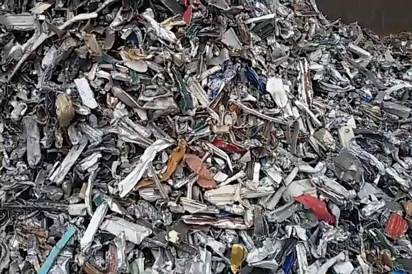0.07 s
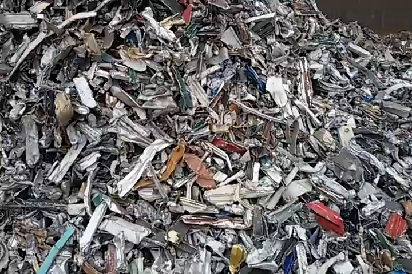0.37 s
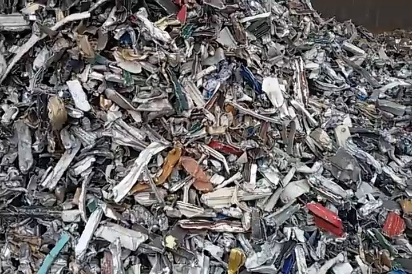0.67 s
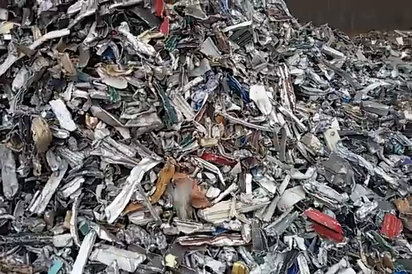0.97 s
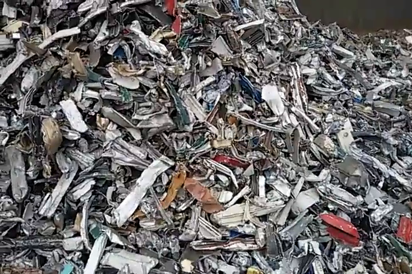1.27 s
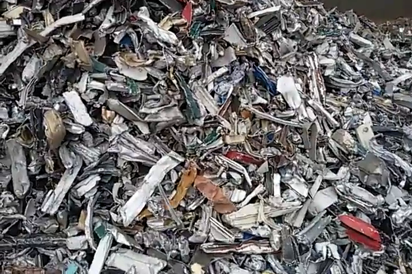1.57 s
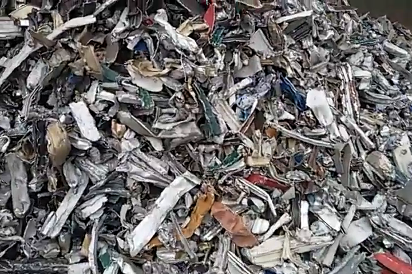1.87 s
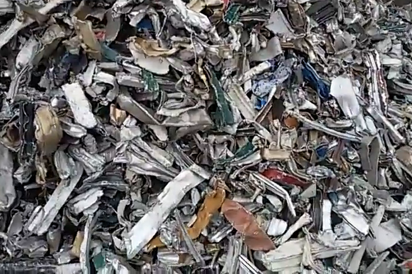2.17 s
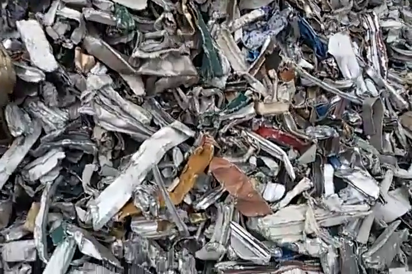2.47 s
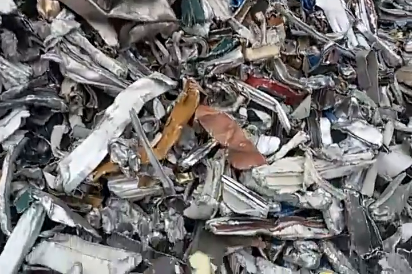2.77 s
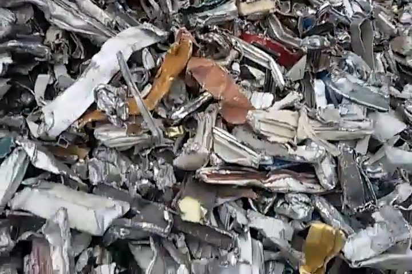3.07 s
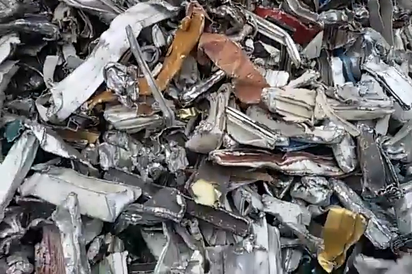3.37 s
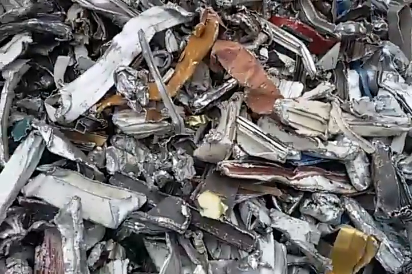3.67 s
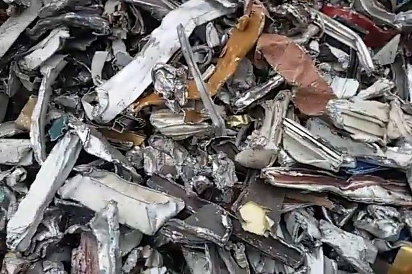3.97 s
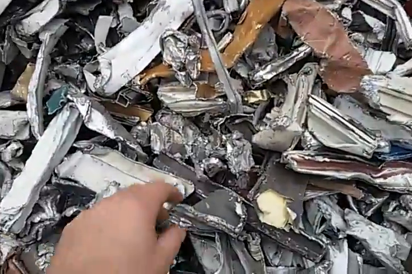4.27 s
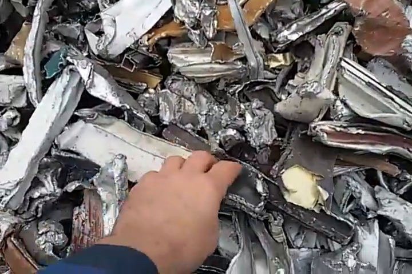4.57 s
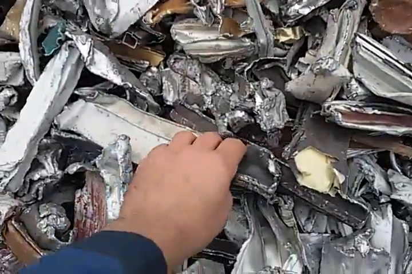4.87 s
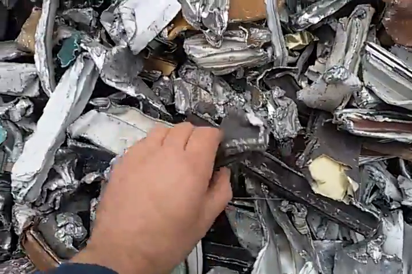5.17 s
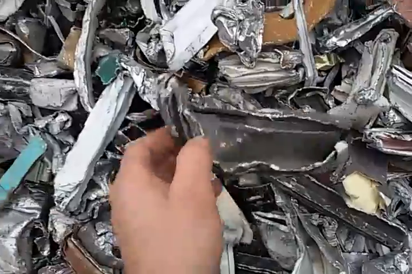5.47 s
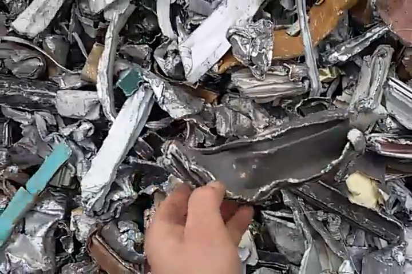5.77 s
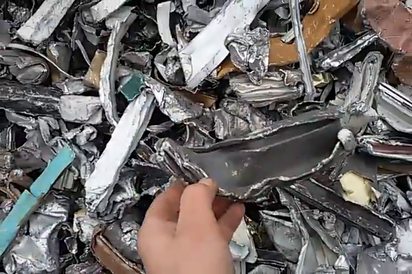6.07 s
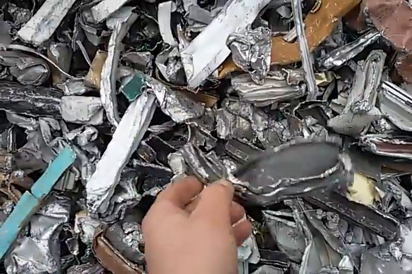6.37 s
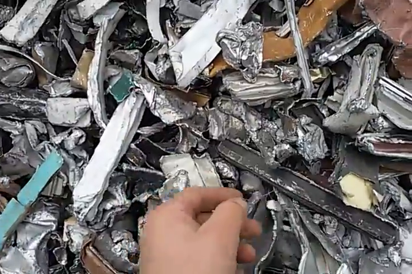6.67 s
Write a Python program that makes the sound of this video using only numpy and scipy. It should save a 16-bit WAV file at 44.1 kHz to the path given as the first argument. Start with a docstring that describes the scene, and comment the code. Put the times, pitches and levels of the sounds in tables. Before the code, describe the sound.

After a short silence, a dense, bright clatter of shredded metal falling onto a heap swells in at about 0.4 seconds, over the low hum and rumble of machinery. It dips for an instant, and the first clinks land just after 0.5 seconds. From 1 second, stiff pieces ring with short, high notes and heavier lumps knock dully, mostly before 3 seconds. From about 1.4 seconds, sliding edges give occasional tiny, high squeaks. Near 2 seconds the motor hum shifts to a lower tone while the machinery churns on. Sharp clinks keep standing out from the fine tinkling of small splinters, with the hardest landings between about 4.2 and 4.5 seconds. More strong clinks follow around 5 seconds, a dull knock comes near 6 seconds, and the scrap keeps falling until the end, just before 7 seconds.

```python
"""Shredded aluminium scrap tumbles onto a heap in a recycling yard.
After a short silence a dense clatter of small pieces swells over the hum and rumble of machinery,
dips briefly, and the first loud clink lands. From 1 s on, stiff pieces ring and heavy lumps knock dully;
then scraping edges begin to squeak, and near 2 s two motors trade the load.
The hardest landings come just after 4 s, and the scrap keeps falling to the end."""
import sys
import numpy as np
from scipy import signal
from scipy.fft import rfft, irfft
from scipy.io import wavfile
from scipy.ndimage import uniform_filter1d

SR = 44100
rng = np.random.default_rng(int(sys.argv[2]) if len(sys.argv) > 2 else 0)


def transcribe(u):
    """Save the signal u as a 16-bit wav file named by the first command-line argument.

    u: samples, shape (n,) or (channels, n), limited to [-1, 1]; the rate is SR.
    q: integer samples, one column per channel.
    """
    v = np.clip(np.atleast_2d(u).T, -1, 1)
    q = np.round(v * 32767).astype(np.int16)
    wavfile.write(sys.argv[1], SR, q)


N = 300762

# Levels are relative within each layer.
# two motors trading the load: f/Hz, level before/dB, level after/dB, t of the change/s
MOTORS = [(134.7, -45.5, -40.5, 1.65), (177.6, -40.5, -48, 2.05)]
RUMBLE_SPECTRUM = [(20, -24), (33, -24), (45, 1), (65, 2), (81, 8), (100, 2.5), (160, 2.5), (230, 0),
                   (400, -19.5), (1000, -60)]  # steady rumble of the plant: f/Hz, level/dB
CHURN_SPECTRUM = [(90, -53), (180, -4.5), (260, 1), (400, -3.5), (650, -5.5), (1000, -3), (2000, -11.5),
                  (5000, -52)]  # material churning in the machinery: f/Hz, level/dB
CHURN_LEVELS = [(0.55, -39.5), (0.9, -36), (1.8, -33.5), (2.1, -32.5), (2.45, -36.5), (2.8, -32),
                (3.05, -36.5), (4.2, -38.5), (4.5, -40.5), (5.15, -40), (5.4, -37), (5.7, -39.5),
                (6.0, -35), (6.3, -39.5), (6.8, -36.5)]  # course of that churning: t/s, level/dB
LUMPS = [(1.014, -25.5, 1106, 0.84), (1.384, -24, 1090, .1), (1.69, -20, 1058, 0.57), (1.849, -21, 205, .1),
         (2.059, -23.5, 501, .1), (2.12, -18.5, 291, 0.05), (2.319, -17, 902, .1), (2.511, -20, 251, 0.16),
         (2.723, -20, 276, .1), (2.759, -18.5, 270, 0.17), (2.972, -26, 896, 1), (3.099, -24, 520, 0.24),
         (3.775, -30, 783, 0.8), (4.158, -22, 1080, 0.44), (5.991, -22, 580, .1), (6.03, -27, 675, 0.65)]  # heavy and hollow pieces: t/s, level/dB, f/Hz, hollowness (0-1)
STREAM_LEVELS = [(0.65, -26, -43), (0.79, -22, -37.5), (0.99, -20, -33), (1.35, -22, -35),
                 (1.52, -20.5, -31), (2.04, -21, -35.5), (2.72, -19.5, -31), (3.37, -19, -29.5),
                 (3.7, -21.5, -34), (5.41, -20.5, -29.5), (5.99, -21, -34), (6.8, -21, -37.5)]  # flow of scrap: t/s, shard level/dB, splinter level/dB
STREAM_SPECTRUM = [(250, -38), (500, -10), (900, -21), (1500, -10), (2300, -6.5), (3200, -3.5),
                   (4200, -2.5), (5150, 2), (6000, -6.5), (6900, -11.5), (8700, -14), (11300, -25),
                   (15800, -21.5)]  # clatter of the shards: f/Hz, level/dB
SCRAPES = [(1.39, 0.031, 5650, -14.5), (1.687, .017, 5170, -14), (2.265, 0.007, 3950, -7.5),
           (2.615, 0.025, 4660, -16), (3.211, 0.021, 5890, -15.5), (3.627, 0.061, 6250, -7.5),
           (3.939, 0.024, 5860, -16.5), (4.007, 0.0069, 5240, -2.5), (4.105, 0.0081, 8580, -16),
           (4.449, 0.028, 5020, -6), (4.811, 0.021, 2590, -19.5), (5.167, 0.0096, 4900, -4),
           (5.223, 0.024, 6180, -14.5), (5.254, .013, 5080, -12)]  # edges sliding over one another: t/s, duration/s, f/Hz, level/dB
STIFF_PIECES = [(1.022, 2960, -18.5, .29), (1.526, 5520, -12.5, .19), (1.532, 7100, -19, .16),
                (1.655, 2940, -23, .24), (1.93, 3520, -12.5, .25), (2.014, 2060, -23.5, 0.73),
                (2.021, 8250, -18, .14), (2.045, 3580, -21.5, 0.46), (2.427, 4310, -13, .24),
                (2.47, 2634, -20.5, .37), (2.468, 3273, -18.5, .5), (2.52, 5260, -16.5, .45),
                (2.585, 4740, -19, .34), (2.787, 3180, -13, .18), (2.931, 2340, -23, .7),
                (2.942, 5038, -20, .7), (2.944, 3962, -14, 0.28), (2.944, 2056, -20, 0.77),
                (2.953, 3180, -20, .5), (2.955, 5730, -7, 0.1), (3.04, 4780, -13, 0.51),
                (3.177, 2305, -16, .18), (3.25, 2067, -25.5, .6), (3.438, 2150, -18, .38),
                (3.451, 1520, -27.5, 1), (3.66, 3780, -15.5, 0.35), (4.016, 4520, -14, 0.38),
                (4.277, 5120, -1, .1), (4.312, 4520, -11, 0.36), (4.353, 1876, -24.5, 0.52),
                (4.472, 1855, -24.5, 0.81), (4.559, 3255, -14.5, 0.4), (4.649, 3020, -20, .2),
                (4.752, 3290, -23, .41), (4.755, 2475, -23, 0.65), (4.88, 1564, -23, .36),
                (5.012, 3251, -20, .27), (5.135, 3840, -17.5, .73), (5.172, 5964, -21, .39),
                (5.411, 4230, -12, 0.19), (5.42, 3780, -17.5, 0.37), (5.662, 3240, -20.5, .35),
                (5.678, 2519, -27, .3), (6.275, 3090, -13, 0.24), (6.326, 3190, -20, .51),
                (6.627, 2150, -18.5, .27), (6.635, 3240, -15, .18), (6.639, 5146, -13, .2),
                (6.645, 1254, -29.5, 1), (6.665, 1120, -30, 1)]  # pieces that hold one note: t/s, f/Hz, level/dB, T60/s
BIG_PIECES = [(0.536, -22, .25, -29), (0.639, -17.5, 0.58, -32), (0.775, -21, 0.54, -22),
              (0.995, -16, .35, -34), (1.1, -20, 0.32, -35), (1.325, -16.5, 0.44, -35),
              (1.395, -20, .44, -22), (1.521, -20, 0.29, -19), (1.59, -14, 0.46, -29),
              (1.893, -10.5, 0.43, -27), (1.93, -15, .52, -36), (2.012, -19, 0.32, -20),
              (2.222, -24, .65, -23), (2.264, -17, 0.15, -19), (2.399, -15, .1, -32),
              (2.69, -16, 0.38, -22), (2.783, -17, .26, -36), (2.81, -21, .38, -18.5),
              (2.928, -29, .2, -18), (3.035, -10, 0.16, -17), (3.426, -9, 0.21, -26),
              (3.535, -14, .26, -35), (3.88, -16, 0.26, -21), (3.946, -21, 0.44, -21),
              (4.015, -11, 0.14, -37), (4.179, -19, 0.56, -23), (4.267, -7, 0.23, -8),
              (4.35, -20, .21, -20), (4.457, -12, .27, -12), (4.504, -10, 0.06, -21),
              (4.603, -22, 0.71, -26), (4.75, -22, 0.42, -26), (4.877, -10, 0.16, -19),
              (4.937, -17.5, 0.25, -14.5), (5.079, -16, 0.25, -38), (5.129, -10, 0.2, -20),
              (5.17, -11, 0.35, -24), (5.258, -20, 0.42, -21), (5.41, -16, 0.47, -34),
              (5.454, -19, 0.37, -22), (5.657, -18, 0.39, -21), (5.824, -12.5, .21, -21),
              (5.906, -20, 0.65, -20), (6.276, -15.5, 0.44, -18), (6.323, -20, .74, -24),
              (6.565, -13, 0.082, -36), (6.627, -13, 0.35, -32)]  # the biggest landings: t/s, level/dB, nominal T60/s, crack level/dB
OPENING_SWELL = [(.372, -90), (.382, -30), (.405, -14), (.48, -3), (.515, -4), (.524, -15), (.534, -15),
                 (.536, 0)]  # fade-in with a brief dip: t/s, gain/dB
# spectra of the clatter's treble, the splinters, and a landing's rasp and crack: f/Hz, level/dB
TREBLE_SPECTRUM = [(5500, -45), (6500, -17), (7500, -5)]
TINKLE_SPECTRUM = [(3000, -24), (7000, -21), (9000, 2), (11500, -7), (15800, -4.5)]
RASP_SPECTRUM = [(600, -22), (1600, -9), (3547.8, -2), (5200, 0), (6800, -8), (9000, -11),
                 (12000, -21), (16000, -24)]
CRACK_SPECTRUM = [(900, -34), (3000, -2), (5200, 1), (8500, -1.5), (12000, -13.5), (16000, -17)]
# broad resonance of a lump: f/f0, level/dB
THUD_SPECTRUM = [(.25, -30), (.5, -11), (1, 0), (1.06, -5.5), (2, -11), (6, -35), (16, -60)]


def amp(db):
    """Amplitude ratio of a level in decibels."""
    return 10 ** (np.asarray(db) / 20)


def unit(x):
    """Normalisation to rms 1."""
    return x / np.sqrt(np.mean(x ** 2) + 1e-20)


def clock(length):
    """Sample times over a duration in seconds."""
    return np.arange(int(length * SR)) / SR


def curve(rows, column=1):
    """Linear interpolation of a table column in time."""
    rows = np.asarray(rows)
    return np.interp(np.arange(N) / SR, rows[:, 0], rows[:, column])


def add(mix, s, sound):
    """Superposition of a sound on the mix at time s."""
    part = mix[max(round(s * SR), 0):][:len(sound)]
    part += sound[:len(part)]


def colour(x, points):
    """Spectral shaping by (f/Hz, level/dB) points on a logarithmic frequency axis."""
    hz, db = np.transpose(points)
    bin_hz = np.fft.rfftfreq(len(x), 1 / SR)
    gain = amp(np.interp(np.log(bin_hz + 1), np.log(hz), db))
    return irfft(rfft(x) * gain, len(x))


def drift(rate_hz, size=N):
    """Random fluctuation: low-pass Gaussian noise of rms 1."""
    hz = np.fft.rfftfreq(size, 1 / SR)
    return unit(irfft(rfft(rng.standard_normal(size)) * np.exp(-(hz / rate_hz) ** 2), size))


def bending_modes(hz, weight, t60, t):
    """Free vibration: a sum of damped modes, each of random strength, decay and phase."""
    strength, life, phase = rng.standard_normal((3, len(hz), 1))
    decay = np.log(1000) / (t60 * np.exp(0.41 * life))
    angle = 2 * np.pi * hz[:, None] * t + np.pi * phase
    return (weight * strength[:, 0]) @ (np.exp(-decay * t) * np.sin(angle))


def contact(t, t60):
    """Contact noise of a crumpled edge: a burst with exponential decay."""
    return rng.standard_normal(len(t)) * amp(-60 * t / t60)


def landings(per_s, spread_db=3):
    """Uniformly random arrivals: rows of t/s, level/dB, place in the pitch range (0-1)."""
    when, force, place = rng.random((round(per_s * N / SR), 3)).T
    return zip(when * N / SR, spread_db * (2 * force - 1), place)


def machinery(settle_s=0.45, waver_hz=1.294, throb_db=2.5, lumpy_db=2):
    """Tones over broadband noise: each motor's hum follows its load, amid rumble and lumpy churning."""
    rumble = amp(-40.5) * unit(colour(rng.standard_normal(N), RUMBLE_SPECTRUM))
    lumpy_noise = rng.standard_normal(N) * amp(lumpy_db * drift(31))
    churn = amp(curve(CHURN_LEVELS) + 1.5) * unit(colour(lumpy_noise, CHURN_SPECTRUM))
    hum = np.zeros(N)
    for hz, before_db, after_db, shift_s in MOTORS:
        shifted = np.clip((np.arange(N) / SR - shift_s) / settle_s + .5, 0, 1)
        note = np.sin(2 * np.pi * np.cumsum(hz + waver_hz * drift(6.7)) / SR)
        throb = amp(throb_db * drift(16))
        hum += amp(before_db + (after_db - before_db) * shifted) * unit(throb * note)
    return rumble + churn + hum


def knocks(thud_t60=0.12, rise_s=0.0036, level_db=-10, note_db=11, note_t60=0.28):
    """Damping broadens a resonance: lumps thud on the heap, and hollow ones keep a short note."""
    out, t = np.zeros(N), clock(.25)
    onset = 1 - np.exp(-t / rise_s)
    for s, db, hz, hollow in LUMPS:
        resonance = [(hz * ratio, gain_db) for ratio, gain_db in THUD_SPECTRUM]
        thud = onset * colour(contact(t, thud_t60), resonance)
        note = hollow * onset * amp(note_db - 60 * t / note_t60) * np.sin(2 * np.pi * hz * t)
        add(out, s, amp(db + level_db) * (thud / np.std(thud[t < .025]) + note))
    return out


def shards(per_s, spread_db, low_hz, high_hz, t60, tick_share, tick_t60, modes, kinds):
    """Poisson impacts, a few much harder; by similarity, a shard's size shifts all its modes together."""
    out, t = np.zeros(N), clock(0.081)
    impacts = []
    for _ in range(kinds):
        hz = np.exp(rng.uniform(np.log(low_hz), np.log(high_hz), size=modes))
        ring = unit(bending_modes(hz, np.sqrt(hz), t60, t))
        impacts.append(ring + tick_share * unit(contact(t, tick_t60)))
    chance, force, smallness, kind = rng.random((4, N))
    gain = amp(spread_db * np.minimum(-np.log(force + 1e-9), 3.6))
    for n in np.flatnonzero(chance < per_s / SR):
        speed = 1 + .2 * (smallness[n] - .5)
        impact = np.interp(t * speed, t, impacts[int(kind[n] * kinds)], right=0)
        add(out, n / SR, gain[n] * impact)
    return unit(out)


def clatter(far_db=-5, treble_db=-3.5, tinkle_db=-5, gush_db=2, gush_hz=14):
    """Incoherent summation: far shards merge to a wash under near ones; splinters tinkle in gushes."""
    near = shards(per_s=520, spread_db=3, low_hz=900.7, high_hz=14000, t60=0.095,
                  tick_share=0.47, tick_t60=0.021, modes=24, kinds=40)
    far = amp(far_db) * rng.standard_normal(N)
    scrap = unit(colour(near + far, STREAM_SPECTRUM))
    treble = colour(scrap, TREBLE_SPECTRUM)
    splinters = shards(per_s=150, spread_db=5, low_hz=6730, high_hz=14600, t60=0.062,
                       tick_share=0.35, tick_t60=.008, modes=4, kinds=30)
    tinkles = unit(colour(splinters, TINKLE_SPECTRUM))
    gushes = amp(gush_db * drift(gush_hz))
    fine = (amp(treble_db) * unit(treble) + amp(tinkle_db) * tinkles) * gushes
    return amp(curve(STREAM_LEVELS)) * (scrap - treble) + amp(curve(STREAM_LEVELS, column=2)) * fine


def squeaks(glide=0.018, jitter=0.0073, flutter=.4, tail_t60=0.094, tail_db=-7):
    """Stick-slip friction drives one mode; its pitch climbs with the pressure and the heap scatters it."""
    out = np.zeros(N)
    for s, length, hz, db in SCRAPES:
        progress = clock(length) / length
        pitch = hz * (1 + glide * (progress - .5) + jitter * drift(500, len(progress)))
        tone = np.sin(2 * np.pi * np.cumsum(pitch) / SR) * (1 + flutter * drift(570, len(progress)))
        add(out, s, amp(db) * unit(tone) * np.sin(np.pi * progress))
    tail = contact(clock(.15), tail_t60)
    scattered = signal.oaconvolve(out, tail / np.linalg.norm(tail))[:N]
    return out + amp(tail_db) * scattered


def rings(rise_s=0.00078, twin_share=0.25, split_hz=24, chatter=0.33, level_db=-1):
    """Beating of close modes: a bent piece holds a note over weaker ones as its neighbours jostle it."""
    out, t = np.zeros(N), clock(.7)
    onset = 1 - np.exp(-t / rise_s)
    low_hz, high_hz, faint_db, faint_t60 = 2200, 6200, -27, .36
    faint = [(s, low_hz * (high_hz / low_hz) ** place, faint_db + db, faint_t60)
             for s, db, place in landings(per_s=7)]
    for s, hz, db, t60 in list(STIFF_PIECES) + faint:
        side, phase = rng.uniform(-1, 1, size=2)
        beat_hz = split_hz * (side + np.sign(side))
        beating = 1 + twin_share * np.exp(1j * np.pi * (2 * beat_hz * t + phase))
        jostle = 1 + chatter * (drift(66, len(t)) + 1j * drift(50, len(t)))
        note = amp(-60 * t / t60) * (np.exp(2j * np.pi * hz * t) * beating * jostle).real
        jangle_hz = hz * 1.6 ** rng.uniform(-.5, 1, size=5)
        jangle = bending_modes(jangle_hz, weight=.16, t60=0.66 * t60, t=t)
        add(out, s, amp(db + level_db) * onset * (note + jangle))
    return out


def clinks(cluster_hz=4380, spread=0.088, log_width=0.35, crumple_s=0.00064, bounce=0.17):
    """Impact excitation: larger pieces land with a crack, ring in a cluster of modes and rebound once."""
    out, t = np.zeros(N), clock(0.36)
    onset = 1 - np.exp(-t / crumple_s)  # a crumpled edge gives way, so the landing takes time to build
    light_db, light_t60, light_crack_db = -24.5, 0.21, -36
    light = [(s, light_db + db, light_t60, light_crack_db + db) for s, db, _ in landings(per_s=5)]
    for s, db, t60, crack_db in list(BIG_PIECES) + light:
        # each clink rings in a bright cluster near 4.4 kHz, varying slightly at random
        centre_hz = cluster_hz * (1 + spread * rng.uniform(-1.2, 1))
        hz = np.exp(rng.uniform(np.log(1400), np.log(13000), size=70))
        weight = np.exp(-np.log(hz / centre_hz) ** 2 / (2 * log_width ** 2)) + 0.017
        ring = bending_modes(hz, weight, 0.71 * t60, t)
        rasp_spectrum = list(RASP_SPECTRUM)
        rasp_spectrum[2] = (0.81 * centre_hz, -2)  # the lower shoulder follows the cluster
        rasp = colour(contact(t, 0.61 * t60), rasp_spectrum)
        strike = amp(db - 3) * (ring / np.std(ring[t < .012]) + rasp / np.std(rasp[t < .012]))
        crack = colour(contact(t, t60=0.11), CRACK_SPECTRUM)
        crack *= amp(crack_db + 3) / np.std(crack[t < .005])
        add(out, s, onset * (strike + crack))
        rebound_s = s + rng.uniform(0.0054, .022)
        add(out, rebound_s, bounce * strike * amp(-60 * t / t60))
    return out


def scene():
    """Superposition of the scrap heap and the plant behind it, in one channel."""
    return (clatter() + clinks() + rings() + squeaks() + knocks() + machinery())[None]


def record(dry, threshold_db=-17, squeeze=0.41, recovery_db_per_s=170, ceiling=.8, edge_hz=15830):
    """Dynamic compression: after the fade-in, loud clinks duck the yard; soft clip and low-pass follow."""
    t = np.arange(N) / SR
    x = dry * amp(curve(OPENING_SWELL)) * (t > OPENING_SWELL[0][0])
    power_db = 10 * np.log10(abs(uniform_filter1d(x[0] ** 2, size=200)) + 1e-12)
    fall_db = t * recovery_db_per_s
    held_db = np.maximum.accumulate(power_db + fall_db) - fall_db  # peak hold with steady release
    over_db = np.maximum(held_db - threshold_db, 0)
    x = x / amp(squeeze * uniform_filter1d(over_db, size=80))
    x = x / (1 + (x / ceiling) ** 6) ** (1 / 6)  # rounds off the loudest peaks
    low_pass = signal.firwin(511, edge_hz, window=("kaiser", 9), fs=SR)
    return signal.oaconvolve(x, low_pass[None], "same")


dry = scene()
out = record(dry)
transcribe(out)
```